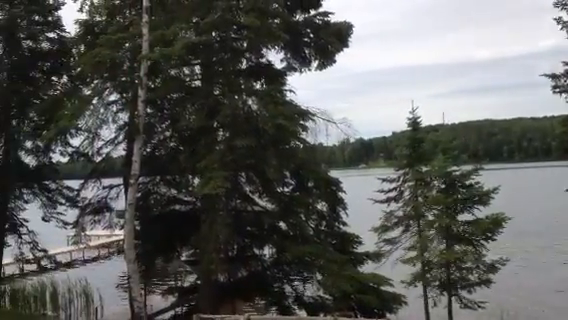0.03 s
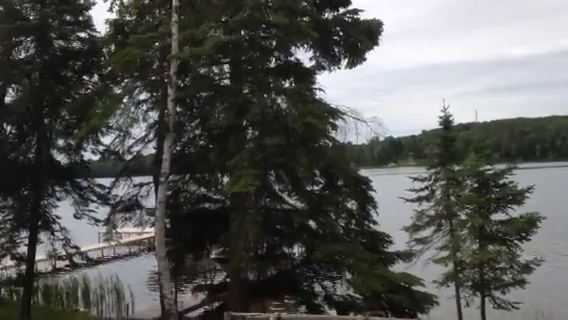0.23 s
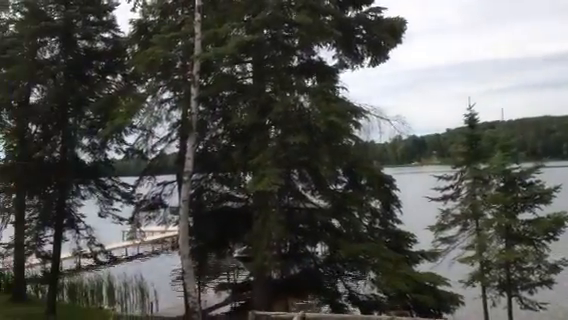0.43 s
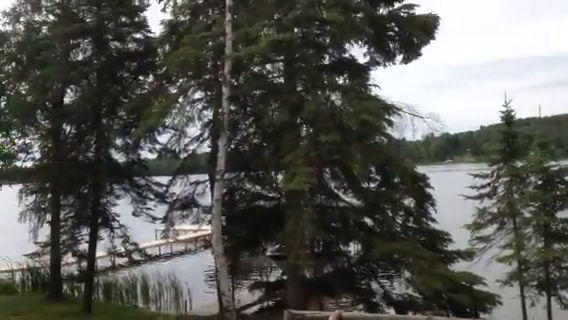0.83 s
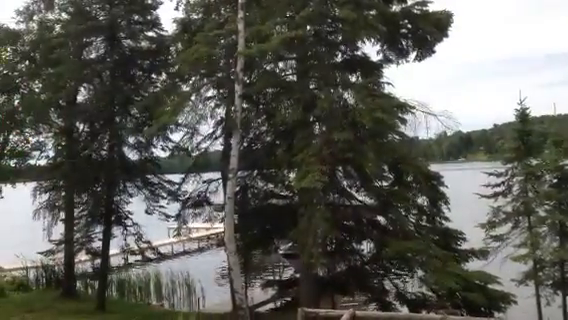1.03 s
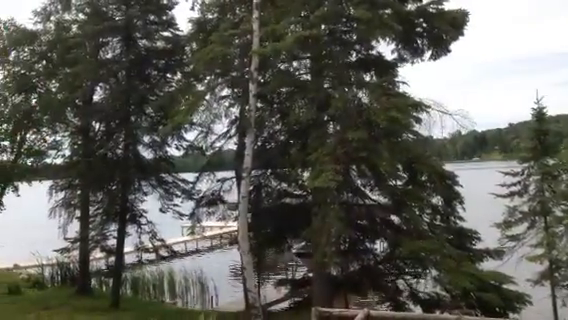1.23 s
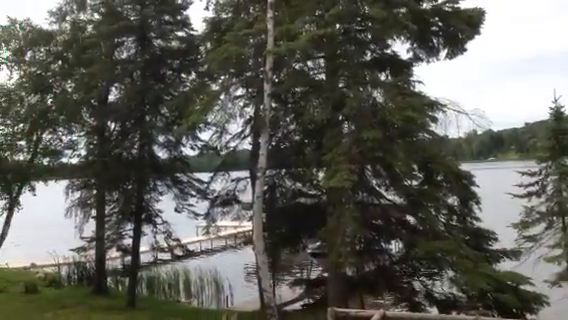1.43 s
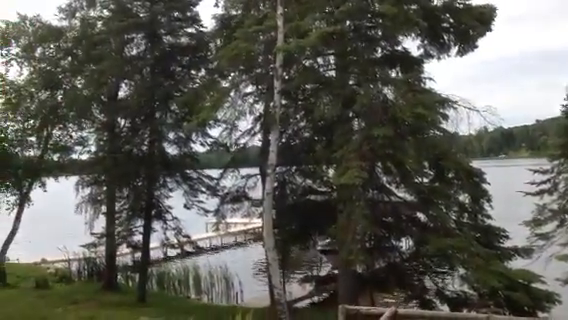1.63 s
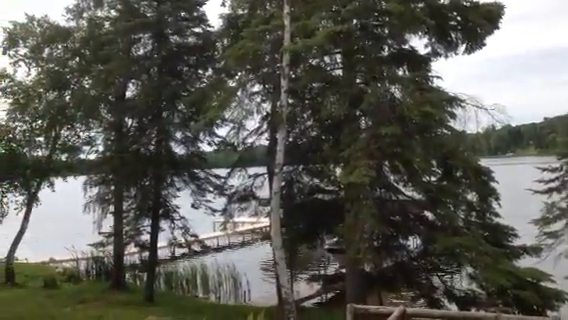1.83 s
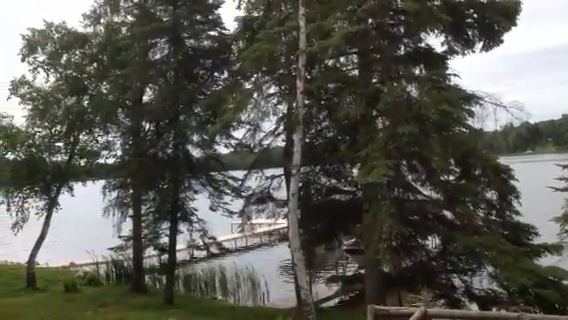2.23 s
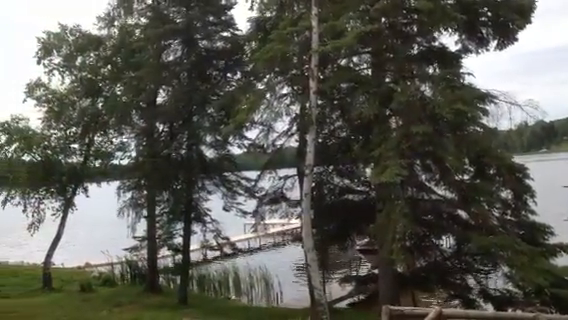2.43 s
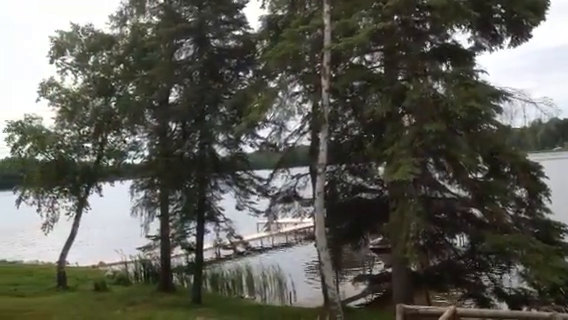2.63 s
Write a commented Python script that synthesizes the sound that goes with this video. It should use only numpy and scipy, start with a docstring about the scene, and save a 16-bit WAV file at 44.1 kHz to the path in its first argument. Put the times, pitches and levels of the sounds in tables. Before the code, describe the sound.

Loons call back and forth over open water, one pure and flute-like, the other brighter and reedier. Each gives two fast, trembling calls that slide up from a low note and echo, heard from the shore over faint wind and hiss.

```python
"""Two loons trade tremolo calls across a lake, heard through one microphone. Each call starts on
a low, reedy note that slides up and breaks into a high register, where pitch and loudness swing
about eleven times a second as the bird's effort rises and sags. The wooded shore echoes them.
Behind the birds lie faint wind, a low hum and hiss; a few small ticks sound near the microphone."""
import sys
import numpy as np
from scipy import signal
from scipy.fft import rfft, irfft, next_fast_len
from scipy.io import wavfile
from scipy.ndimage import uniform_filter1d, map_coordinates

SR = 44100
rng = np.random.default_rng(int(sys.argv[2]) if len(sys.argv) > 2 else 0)


def waveform_to_disk(signal):
    """Save audio, clipped to [-1, 1], as 16-bit WAV at the path in sys.argv[1]."""
    frames = np.transpose(np.atleast_2d(signal))
    scaled = np.clip(frames, -1, 1) * 32767
    samples = np.round(scaled).astype(np.int16)
    wavfile.write(sys.argv[1], SR, samples)


N = 123479

# colour of the wind, the early and late hiss, and the ticks: f/Hz, relative level/dB
WIND_COLOUR = [(25, -29), (45, -25), (80, -13.5), (115, -4.5), (200, -0.5), (330, -6.5), (600, -6.5),
               (1000, -5), (2000, -12.5), (3500, -18.5), (8000, -33)]
HISS_EARLY_COLOUR = [(1650, -20), (2800, -7.5), (3200, -7), (4180, -1), (5230, -8), (7280, -3), (7970, -4),
                     (9640, -13), (11600, -6), (15000, -11)]
HISS_LATE_COLOUR = [(1650, -36), (2800, -6.5), (3310, -6.5), (3580, -2), (4090, -2.5), (5190, -5),
                    (5770, -6), (6830, -5), (9980, -12), (15000, -4.5)]
TICK_COLOUR = [(500, -15), (1500, -10), (4500, -5.5), (9000, -13.5), (15000, -36)]
# partials of the hum: f/Hz, level at mid-scene/dB
HUM_PARTIALS = [(110.4, -89), (166, -81.5), (221, -81), (275, -83)]
# ticks near the microphone: t/s, noise level/dB, ring f/Hz, t60/s
TICKS = [(1.364, -70.5, 4470, 0.07), (1.668, -74.5, 4420, 0.18), (2.325, -72, 3800, 0.15),
         (2.728, -63.5, 1587, 0.057)]
# echoes off the nearest trees, one list per call: delay/s, level before foliage loss/dB
PURE_ECHOES = [
    [(.0176, -10.5), (.02373, -13.5), (.06085, -17.7)],
    [(.01911, -9), (.02694, -15)],
]
BRIGHT_ECHOES = [
    [(.01123, -2), (.04256, -16)],
    [(.01566, -5.5), (.04668, -11.5)],
]
# low notes, one list of curves per call: t/s, f/Hz, level/dB
PURE_LOW_NOTES = [
    [[(0, 757, -55.5), (.04, 672, -63), (.065, 817, -55), (.092, 930, -61)], [(.605, 634, -77),
     (.635, 612, -69), (.675, 617, -65)]],
    [[(1.415, 640, -69), (1.447, 757.5, -55), (1.48, 747.6, -59.5), (1.508, 709, -60.5),
     (1.527, 817, -54.5), (1.543, 930, -65.5)]],
]
BRIGHT_LOW_NOTES = [
    [[(.711, 698, -54), (.726, 764, -50.5), (.745, 771.4, -47.5), (.762, 734, -51.5), (.777, 640, -62)],
     [(.792, 717, -49.5), (.803, 778, -50), (.814, 850, -54)], [(1.262, 572.3, -62), (1.3, 618, -68),
     (1.35, 584, -60)]],
    [[(2.055, 655, -55.5), (2.083, 737, -59), (2.12, 667, -60), (2.148, 743, -55.5), (2.166, 830, -61.5)],
     [(2.435, 651, -56.5), (2.455, 719, -58.5), (2.476, 818, -67)]],
]
# harmonics 1, 2, 3 of the low notes: relative level/dB
PURE_LOW_HARMONICS = [-3.5, -4, -22]
BRIGHT_LOW_HARMONICS = [-10.5, -1.5, -18.5]
# the pure loon's last note: t/s, f/Hz, level/dB
HELD_NOTE = [(1.96, 975, -58), (2.0, 978, -56.5), (2.048, 1000, -59)]
# tremolo crests, one list per call: t/s, f/Hz, level/dB, lift of harmonic 2/dB
PURE_CRESTS = [
    [(.078, 1233, -43.5, 0), (.175, 1236, -45.2, 2), (.265, 1227, -45, 2), (.357, 1229, -45, 1),
     (.455, 1209, -48, 1), (.555, 1129, -48.5, 3.5)],
    [(1.542, 1201, -42.5, -1), (1.635, 1220, -44, -5), (1.727, 1235, -42.5, -4.5), (1.821, 1212, -44.5, -2),
     (1.919, 1167, -45.5, -4.5)],
]
BRIGHT_CRESTS = [
    [(.826, 1190, -44, -2), (.919, 1197, -42, 0), (1.012, 1194, -43, 1.5), (1.105, 1189, -42.5, 0.5),
     (1.2, 1153, -49, 2.5)],
    [(2.168, 1158, -49.5, -2.5), (2.269, 1150, -45.5, -1), (2.367, 1157, -49, 0), (2.474, 1117, -49, -4)],
]
# stretches in the high register, one list per call: start/s, end/s
PURE_SPANS = [
    [(0.095, .592)],
    [(1.548, 1.96)],
]
BRIGHT_SPANS = [
    [(.813, 1.255)],
    [(2.162, 2.425), (2.467, 2.52)],
]
# harmonics 2, 3, .. of the high register, before any lift: level against the fundamental/dB
PURE_OVERTONES = [-31, -45]
BRIGHT_OVERTONES = [-16.5, -31, -20.5, -36]


def amp(db):
    return 10 ** (np.asarray(db) / 20)


def clock():
    return np.arange(N) / SR


def wobble(rate):
    """A smooth random curve, rate knots a second."""
    return map_coordinates(rng.standard_normal(600), [clock() * rate], mode="wrap")


def filtered(x, response):
    """x through a filter whose gain is response(hz)."""
    size = next_fast_len(N + SR // 2)
    return irfft(rfft(x, size) * response(np.fft.rfftfreq(size, 1 / SR)), size)[:N]


def noise(colour):
    """Noise of rms 1 in the given colour."""
    f, db = np.transpose(colour)
    x = filtered(rng.standard_normal(N), lambda hz: amp(np.interp(np.log(hz + 1), np.log(f + 1), db)))
    return x / np.sqrt(np.mean(x ** 2) + 1e-20)


def gate(start, end, edge_s=0.0072):
    """Opens at start and closes at end, with soft edges."""
    t = clock()
    return (1 + np.tanh(2 * (t - start) / edge_s)) * (1 + np.tanh(2 * (end - t) / edge_s)) / 4


def hiss(change_s=1.3, fade_s=0.074):
    """A thin hiss that drops a little and changes colour about halfway."""
    late = (1 + np.tanh((clock() - change_s) / fade_s)) / 2
    return (np.sqrt(1 - late) * amp(-68) * noise(HISS_EARLY_COLOUR)
            + np.sqrt(late) * amp(-71) * noise(HISS_LATE_COLOUR))


def hum(rise_db_per_s=3.5):
    """A low hum that slowly swells, each partial wavering in level and phase."""
    t = clock()
    partials = sum(amp(db + 1.4 * wobble(6.76)) * np.sin(2 * np.pi * hz * t + 0.67 * wobble(14))
                   for hz, db in HUM_PARTIALS)
    return amp(rise_db_per_s * (t - t.mean())) * partials


def wind():
    """Faint, almost steady wind at the lake."""
    return amp(-69 + 0.46 * wobble(3.9)) * noise(WIND_COLOUR)


def ticks(ring_db=3):
    """Small dry ticks close to the microphone: each a puff of noise with a brief ring."""
    t = clock()
    sound = np.zeros(N)
    for start, db, hz, t60 in TICKS:
        decay = (t >= start) * amp(db - 60 * np.abs(t - start) / t60)
        puff = noise(TICK_COLOUR)
        ring = amp(ring_db) * np.sin(2 * np.pi * hz * t + wobble(200))
        sound += decay * (puff + ring)
    return sound


def shore(call, echoes, scatter_db, scatter_t60, tail_db, tail_t60, tail_build_s, foliage_hz):
    """A call at the microphone: direct sound, echoes, scatter among the trees, a tail over the water."""
    t = np.arange(SR) / SR
    reflected = filtered(call, lambda hz: sum(amp(db) * np.exp(-2j * np.pi * hz * delay)
                                              for delay, db in echoes))
    for db, t60, build_s in ((scatter_db, scatter_t60, .02), (tail_db, tail_t60, tail_build_s)):
        reverb = rng.standard_normal(SR) * amp(-60 * t / t60) * (1 - np.exp(-(t / build_s) ** 2))
        reflected += amp(db) * signal.fftconvolve(call, reverb / np.linalg.norm(reverb))[:N]
    # foliage dulls all but the direct sound
    return call + filtered(reflected, lambda hz: 1 / np.sqrt(1 + (hz / foliage_hz) ** 4))


def voice(hz, harmonics_db, jitter, hoarse):
    """A loon's voice: harmonics on an unsteady pitch; hoarseness makes each overtone flutter."""
    phase = 2 * np.pi * np.cumsum(hz * (1 + jitter * wobble(200))) / SR
    sound = np.zeros(N)
    for k, db in enumerate(harmonics_db, 1):
        flutter = hoarse * (k > 1)
        sine = (1 + flutter * wobble(220)) * np.sin(k * phase)
        cosine = flutter * wobble(220) * np.cos(k * phase)
        sound += amp(db) * (sine + cosine)
    return np.sqrt(2) * sound


def note(curve, harmonics_db, jitter=.007, hoarse=.2):
    """One note sliding along a curve of pitch and level."""
    t = clock()
    times, hz, db = np.transpose(curve)
    pitch = uniform_filter1d(np.interp(t, times, hz), size=500)
    envelope = gate(times[0], times[-1]) * amp(np.interp(t, times, db))
    return envelope * voice(pitch, harmonics_db, jitter, hoarse)


def tremolo(crests, spans, overtones_db, swing_hz, dip_db, sag_lift_db, hoarse):
    """Between crests the effort sags: the voice gets lower and softer, and its overtones change."""
    t = clock()
    times, *columns = np.transpose(crests)
    hz, db, crest_lift_db = (np.interp(t, times, column) for column in columns)
    period = np.diff(times).mean()
    beat = np.interp(t, np.r_[times[0] - period, times, times[-1] + period], np.arange(len(times) + 2))
    sag = np.abs(np.sin(np.pi * beat)) ** 2.6  # 0 on a crest, 1 midway to the next
    lift_db = crest_lift_db + sag_lift_db * sag
    # upper overtones follow the effort most
    harmonics_db = [0] + [level + rank ** 0.85 * lift_db for rank, level in enumerate(overtones_db, 1)]
    envelope = sum(gate(*span) for span in spans) * amp(db - dip_db * sag)
    return envelope * voice(hz - swing_hz * sag, harmonics_db, jitter=0.0024, hoarse=hoarse)


def pure_loon():
    """The first bird across the lake, almost flute-like; its second call ends on a held note."""
    calls = [tremolo(crests, spans, PURE_OVERTONES, swing_hz=241.3, dip_db=12.5,
                     sag_lift_db=7, hoarse=0.83)
             + sum(note(curve, PURE_LOW_HARMONICS) for curve in notes)
             for crests, spans, notes in zip(PURE_CRESTS, PURE_SPANS, PURE_LOW_NOTES)]
    calls[-1] += note(HELD_NOTE, [0, -24], jitter=0.0034, hoarse=0.19)
    return sum(shore(call, echoes, scatter_db=-20, scatter_t60=0.25,
                     tail_db=-16.5, tail_t60=1.7, tail_build_s=0.077, foliage_hz=4040)
               for call, echoes in zip(calls, PURE_ECHOES))


def bright_loon():
    """The answering bird, richer in overtones; its last call drops briefly into the low register."""
    calls = [tremolo(crests, spans, BRIGHT_OVERTONES, swing_hz=197.6, dip_db=10.5,
                     sag_lift_db=-6, hoarse=0.17)
             + sum(note(curve, BRIGHT_LOW_HARMONICS) for curve in notes)
             for crests, spans, notes in zip(BRIGHT_CRESTS, BRIGHT_SPANS, BRIGHT_LOW_NOTES)]
    return sum(shore(call, echoes, scatter_db=-18, scatter_t60=0.51,
                     tail_db=-14.5, tail_t60=0.87, tail_build_s=0.1, foliage_hz=4370)
               for call, echoes in zip(calls, BRIGHT_ECHOES))


def scene():
    """Both birds and the lakeside background at the microphone, in mono."""
    return (pure_loon() + bright_loon() + hiss() + hum() + wind() + ticks())[None]


def record(dry):
    """The recorder keeps nothing above its band limit."""
    return filtered(dry[0], lambda hz: hz < 15350)[None]


dry = scene()
out = record(dry)
waveform_to_disk(out)
```